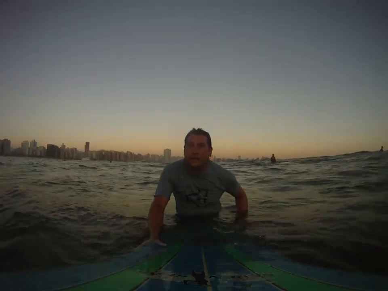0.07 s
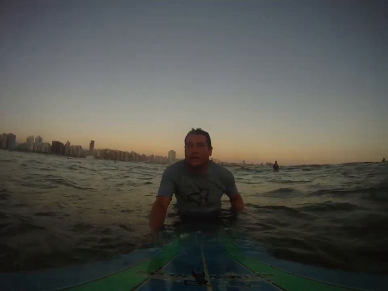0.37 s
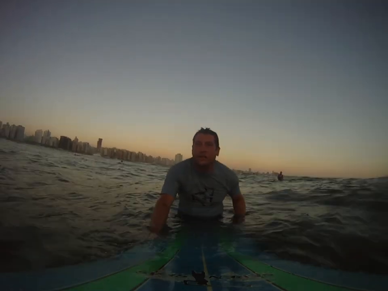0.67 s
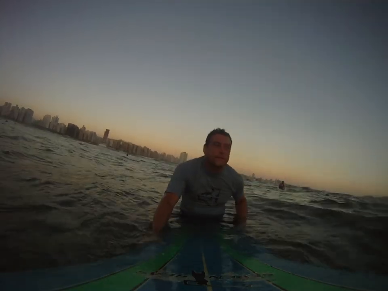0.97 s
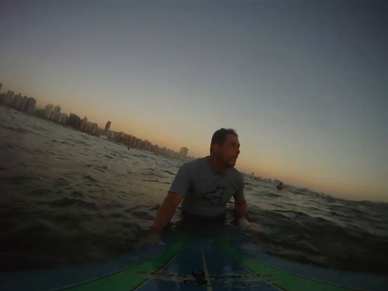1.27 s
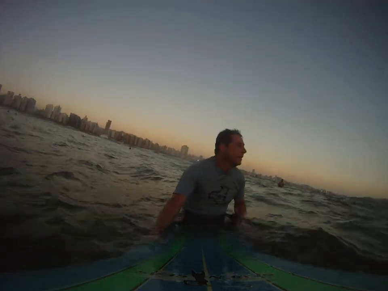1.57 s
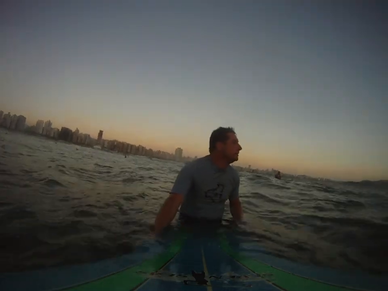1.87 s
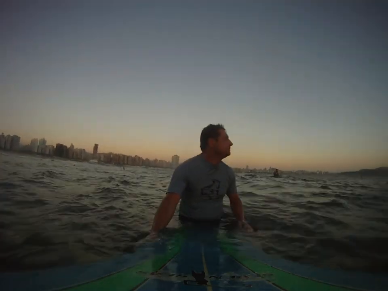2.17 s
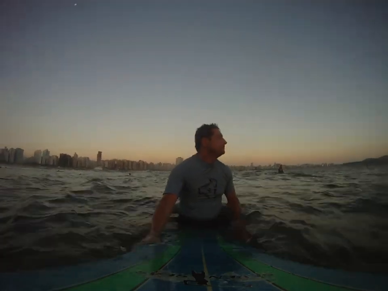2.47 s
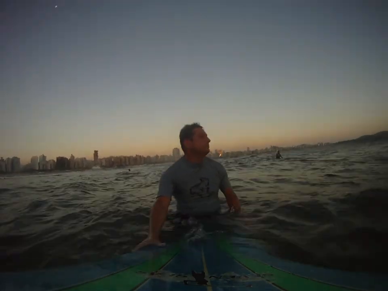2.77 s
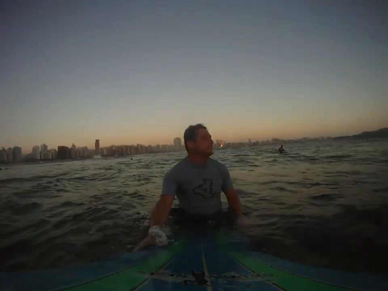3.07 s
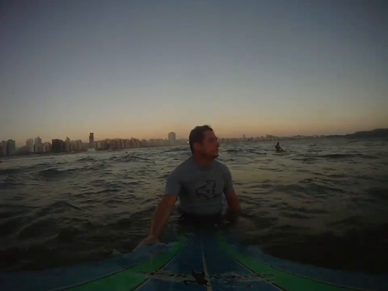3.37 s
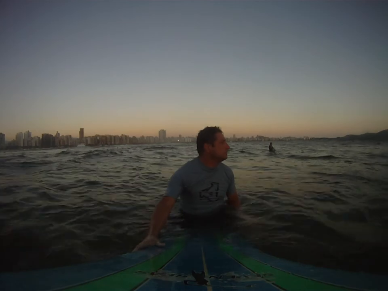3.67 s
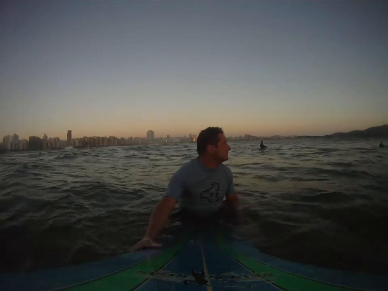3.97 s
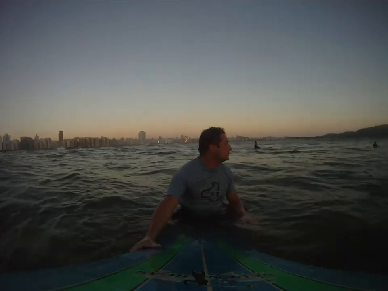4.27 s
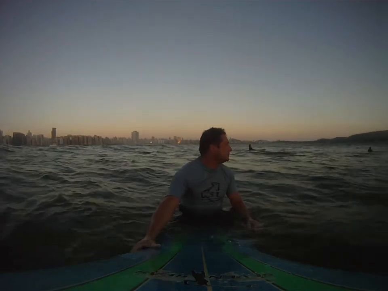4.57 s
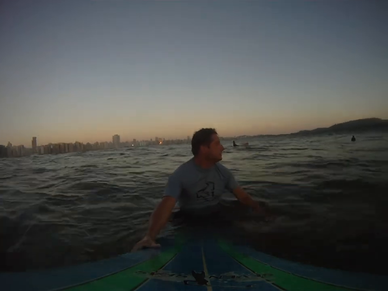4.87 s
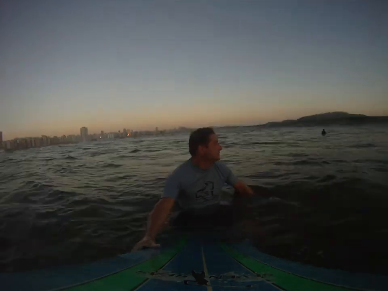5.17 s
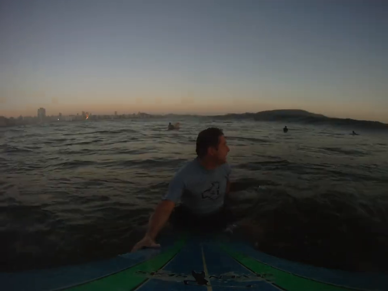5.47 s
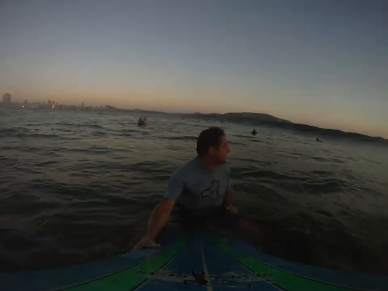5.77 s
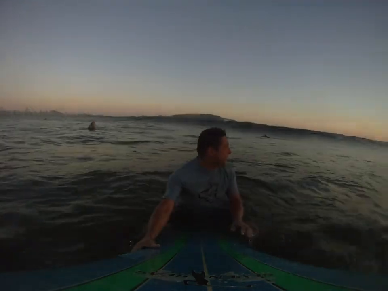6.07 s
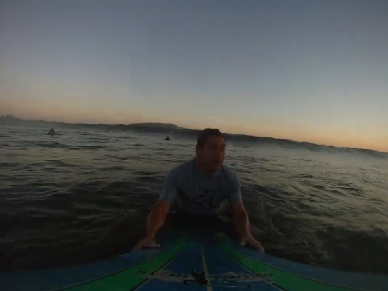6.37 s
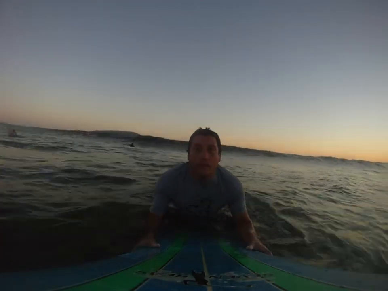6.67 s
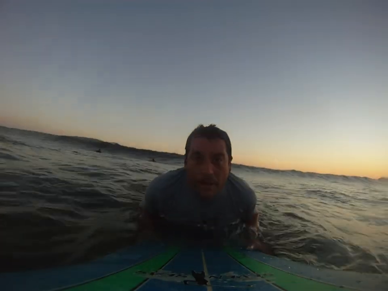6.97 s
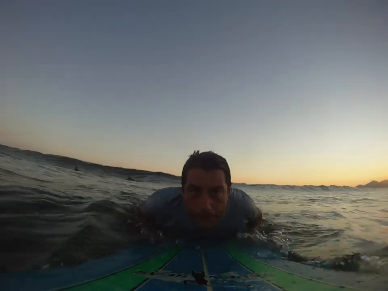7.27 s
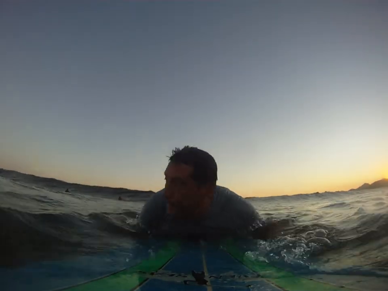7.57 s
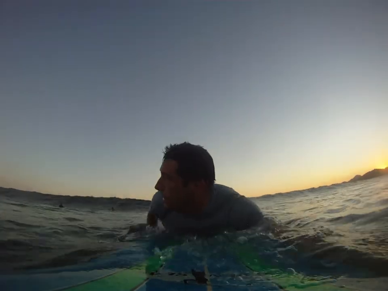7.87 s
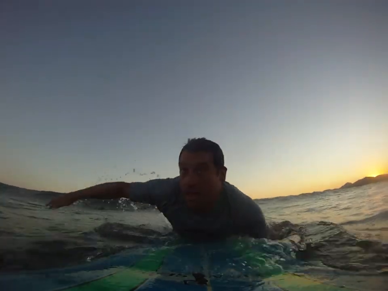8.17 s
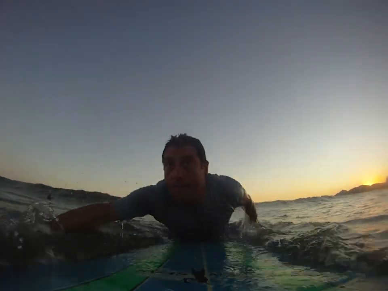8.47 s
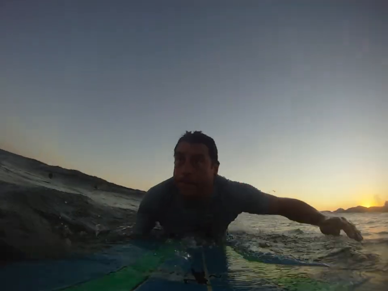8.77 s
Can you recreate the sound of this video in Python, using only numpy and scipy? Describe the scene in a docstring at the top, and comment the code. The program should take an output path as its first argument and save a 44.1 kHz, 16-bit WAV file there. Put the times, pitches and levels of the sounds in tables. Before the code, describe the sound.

Out on the sea, small waves wash unevenly along a surfboard, plipping and knocking softly over a faint steady wash. Past the middle, a deep boom and stronger rumble lead into paddling: repeated splashes, gulps of trapped air and ticking drops. Everything is heard very close, through a ringing waterproof case mounted on the board, with a thin fizz on top.

```python
"""First a wavelet washes along a rumbling surfboard: a surfer sits in choppy sea, then lies down to paddle.
Each wavelet or arm stroke swells and drains, stirring up ringing bubbles, foam, gulps of air and spray.
Slaps of water trap bubbles that go "plip", and bumps make the hull and the camera mount boom.
A camera rides on the nose, so the water is heard through its ringing waterproof case,
and the coarse steps of its 12 kHz recorder add a glassy fizz to everything."""
import sys
import numpy as np
from scipy import signal
from scipy.fft import rfft, irfft
from scipy.io import wavfile
from scipy.ndimage import uniform_filter1d, minimum_filter1d

SR = 44100
rng = np.random.default_rng(int(sys.argv[2]) if len(sys.argv) > 2 else 0)


def wrap_up_sound(samples):
    """Save the sound to the file named by the first command line argument, as 16-bit audio."""
    columns = np.atleast_2d(samples).T
    # keep every value between -1 and 1, then stretch to whole-number steps
    tamed = np.clip(columns, -1, 1)
    steps = np.round(tamed * 32767).astype(np.int16)
    wavfile.write(sys.argv[1], SR, steps)


N = 398663

# wavelets wash along the board's edges; fineness means treble over bass:
# (start [s], length [s], level [dB], fineness [dB], churned air [dB])
WAVELETS = [(0.0, 0.082, -31, 5.5, -41), (0.11, 0.097, -34, 1.5, -37.5), (0.38, 0.11, -41, 1, -69),
            (0.55, .2, -34, -10.5, -52), (0.82, 0.17, -35, -9, -66), (1.11, 0.159, -44, 0, -49.5),
            (1.42, 0.11, -48, 5, -51.5), (1.76, .15, -51, -23, -53), (2.15, .14, -41, -6, -68),
            (2.5, 0.16, -33, -10, -46), (2.69, 0.32, -32, -0.5, -39), (3.1, 0.037, -32.5, -13, -33.5),
            (3.22, 0.11, -39, -15, -45), (3.4, 0.1, -45, -8, -51), (3.73, .1, -34.5, -8.5, -42),
            (3.96, 0.052, -39, -6, -37.5), (4.24, .04, -43, 2, -49), (4.34, 0.101, -46, -4, -49.5),
            (4.66, 0.16, -43, 0.5, -76), (4.87, .15, -42, 0, -72), (5.2, 0.212, -44, -17, -54.5),
            (5.55, .16, -46, -9, -49), (5.98, .08, -42, -23, -41.5), (6.1, 0.078, -33, -11, -46),
            (6.28, 0.069, -29.5, -5, -42.5), (6.42, 0.36, -42, -4.5, -40.5), (6.82, 0.032, -32, -14, -44),
            (7.01, 0.15, -40, 1.5, -48)]
# the tones the camera case rings at: (pitch [Hz], width [Hz], level [dB])
CASE_TONES = [(274.6, 115, -17.5), (388, 36, -7.5), (461, 52, -12.5), (687, 43, -1), (755, 32, -4.5),
              (982, 75, -3.5), (1160, 303, 0.5), (1290, 130, -7.5), (1436, 37, -2.5), (1720, 220, -6),
              (1907, 86, -6.5), (2300, 103, 4), (2440, 632, 0), (2595, 250, -1.5), (3020, 150, -8.5),
              (3676, 380, -8.5)]
# choppy water and the rider shake the board: (time [s], level [dB])
BOARD_SHAKE = [(0.0, -25.5), (0.35, -42.5), (1.2, -42.5), (2.5, -44.5), (2.6, -28.5), (3.3, -33.5),
               (4.25, -34), (4.78, -42.5), (5.38, -42), (5.62, -32.5), (5.95, -37), (6.35, -24),
               (6.54, -30), (6.63, -18), (6.97, -24), (7.3, -18), (7.75, -21), (8.27, -26.5), (8.45, -21.5),
               (8.64, -22), (8.86, -15.5), (9.04, -21)]
# the low tones of board and mount: (pitch [Hz], width [Hz], level [dB])
MOUNT_TONES = [(27.6, 24, -16), (57, 37, -3.5), (87.84, 19.3, 6.5), (122, 22.4, -9.5), (236, 46, -29),
               (288.7, 9.6, -13), (375.8, 22, -32.5)]
# water and rider bump the hull: (time [s], level [dB], pitch [Hz], time to fade by 60 dB [s])
HULL_BUMPS = [(0.588, -28, 91.7, 0.33), (1.219, -23.5, 92.3, 0.19), (1.779, -24, 93.56, 0.2),
              (2.569, -12, 84.6, 0.19), (2.719, -18, 90.2, 0.15), (2.849, -16.5, 84.5, 0.26),
              (2.971, -19, 90, 0.11), (3.108, -25, 94, 0.11), (3.25, -23, 89.7, 0.21),
              (3.548, -19, 92.4, 0.28), (4.001, -23.5, 95.5, 0.12), (4.24, -26, 99, 0.22),
              (4.881, -25, 100, 0.31), (6.37, -17.5, 83, 0.13), (6.605, -2.5, 87.44, 0.14),
              (6.71, -10.5, 87, 0.16), (6.85, 9.5, 81.6, 0.036), (6.899, -2, 84, 0.15), (7.02, -10, 88, .2),
              (7.266, -2.5, 71.6, 0.16), (7.4, -4.5, 73.4, .08), (7.56, -5, 89.2, 0.1),
              (7.682, -6.5, 73, 0.16), (7.77, -9, 75.2, 0.13), (7.93, -7.5, 71.5, 0.096),
              (8.06, -11, 99, 0.12), (8.499, -5, 86.1, 0.093), (8.7, -13, 103.2, .12),
              (8.85, -10, 71.6, 0.22)]
# the tones of air pockets in churning water: (pitch [Hz], width [Hz], level [dB])
POCKET_TONES = [(243, 22, 0), (288.2, 18.6, 16), (340, 210, 1), (385, 27, 1), (385, 380, -7),
                (490, 25.3, -5)]
# big gulps of air under the board: (time [s], level [dB], pitch [Hz], time to fade by 60 dB [s])
AIR_GULPS = [(.11, -27, 290, 0.23), (2.729, -26, 385, 0.11), (3.781, -31, 385, 0.17),
             (3.98, -34, 275, 0.17), (7.339, -15, 310, 0.087), (7.385, -16, 212.6, 0.098),
             (7.43, -18, 352, 0.15), (7.574, -10, 289, 0.046), (7.66, -20, 274, 0.078),
             (7.85, -20, 291, .12), (7.914, -2.5, 385, 0.028), (8.009, -10.5, 278, 0.14),
             (8.35, -22, 323.3, .1), (8.517, -12.5, 297, 0.059), (8.604, -4.5, 255.4, 0.057),
             (8.85, -16, 285.3, 0.086), (8.962, -15, 300, 0.031), (9.0, -16.5, 233, 0.11)]
# the tones of fine spray on the case: (pitch [Hz], width [Hz], level [dB])
SPRAY_TONES = [(2670, 150, -50.5), (3520, 460, 13), (4200, 1400, 4.5), (5300, 1700, 3.5)]
# drops hit the case: (peak time [s], level over 10 ms [dB])
CASE_DROPS = [(.012, -44), (.125, -46), (0.325, -51.5), (.89, -50), (1.29, -56), (2.7, -59), (2.98, -51),
              (3.8, -53.5), (4.262, -54), (4.81, -50), (6.622, -50), (6.855, -41.5), (7.216, -30.5),
              (7.415, -49), (8.62, -32.5)]
# the loudest slaps at the board, each part bubble and part spatter:
# (peak time [s], level over 10 ms [dB], pitch [Hz], bubble share [0-1], rough length [s])
SLAPS = [(0.265, -36.5, 1155, 0.38, 0.0065), (0.325, -38.5, 2360, 0.85, 0.0071),
         (0.389, -23.5, 2380, .9, 0.0035), (0.445, -31, 1280, 0.92, 0.0064),
         (0.486, -32.5, 2340, 1, 0.0037), (0.563, -26.5, 2300, 0.5, 0.007), (0.657, -32, 1820, 0.93, 0.009),
         (0.77, -25, 1210, 0.88, 0.0078), (0.821, -35.5, 2630, .55, 0.0046), (0.855, -31, 1220, 1, 0.0045),
         (0.88, -24, 2234, 0.74, .01), (0.908, -28, 1160, .5, 0.0042), (0.926, -27, 1310, 0.55, 0.01),
         (0.957, -20.5, 1730, 0.73, 0.0046), (1.184, -33.5, 2460, .9, .004), (1.226, -30, 2340, .5, 0.0051),
         (1.291, -37, 2416, 0.67, 0.0054), (1.387, -34.5, 1250, 0.88, .011),
         (1.446, -38.5, 2450, .95, .007), (1.548, -36.5, 2550, 0.51, .011),
         (1.786, -30, 1080, 0.85, 0.0029), (1.932, -44.5, 2380, .95, .007), (2.159, -35, 1006, 0.47, .008),
         (2.19, -30.5, 2310, .3, 0.0083), (2.224, -26.5, 1144, 0.88, .006), (2.263, -30.5, 2416, 1, .004),
         (2.304, -26.5, 2210, 1, 0.0088), (2.472, -38.5, 2653, 0.63, 0.0068),
         (2.501, -28, 2350, 0.88, 0.0041), (2.581, -29, 980, 0.76, .006), (2.596, -27, 2510, 0.67, 0.0087),
         (2.69, -24.5, 1008, 0.21, 0.014), (2.756, -26.5, 1104, .95, 0.0045),
         (2.872, -30.5, 2250, 0.68, 0.0055), (2.973, -25, 1350, 0.7, 0.0063),
         (3.023, -33.5, 2380, 0.86, 0.0062), (3.11, -13.5, 1240, 0.84, 0.0031),
         (3.224, -31.5, 2360, 0.78, .008), (3.265, -39, 1459, .95, .005), (3.284, -24.5, 1099, 1, .006),
         (3.621, -29, 2163, 0.71, 0.0076), (3.689, -33, 1264, 1, 0.0093), (3.736, -49, 1200, 0.91, 0.0041),
         (3.798, -27.5, 2520, 0.46, 0.0033), (3.819, -30, 1190, .55, 0.00507),
         (3.913, -32.5, 1209, .7, 0.0048), (3.991, -38, 770, 0.46, 0.013),
         (4.001, -30.5, 1229, 0.55, 0.0037), (4.051, -32, 1120, 0.84, 0.0064),
         (4.23, -32.5, 1211, 0.72, 0.006), (4.269, -36.5, 2610, 0.36, 0.0052),
         (4.338, -31.5, 1160, 0.99, 0.0041), (4.389, -35.5, 1350, .2, 0.0086),
         (4.429, -40, 1190, 0.7, 0.0047), (4.664, -37.5, 2700, .95, .005), (4.709, -39, 2357, 0.92, 0.0052),
         (4.877, -29.5, 1195, 1, 0.0042), (4.97, -35.5, 1054, 0.089, .008),
         (5.161, -25, 1824, 0.42, 0.0077), (5.639, -32.5, 1206, 0.65, 0.0066),
         (5.959, -34, 1512, .85, 0.0067), (5.989, -29, 1227, 1, 0.0069), (6.043, -25, 731, 1, 0.013),
         (6.115, -24, 1213, 0.22, 0.005), (6.21, -26, 2440, 0.71, 0.0043),
         (6.287, -28.5, 2366, 0.99, 0.0058), (6.308, -23.5, 1290, 1, 0.006), (6.334, -33, 1190, 0.29, .011),
         (6.353, -30, 2581, .55, 0.0041), (6.366, -23.5, 1199, 1, .006), (6.598, -28, 1185, .2, 0.013),
         (6.655, -34.5, 1130, 0.66, .007), (6.836, -26.5, 1110, 0.82, 0.005),
         (6.847, -26.5, 1677, 0.045, .005), (7.063, -26, 2380, 0.57, 0.00685),
         (7.216, -21, 2283, 0.36, 0.012), (7.26, -19.5, 1030, .2, 0.0054), (7.328, -17, 860, .3, .012),
         (7.347, -19.5, 1400, 0.16, 0.0078), (7.431, -33, 1197, 0.81, .012), (7.648, -25.5, 1160, .4, .006),
         (7.886, -22.5, 1100, 0.6, 0.0051), (7.913, -19, 1085, .05, 0.0048), (8.008, -17, 1182, 0.71, .008),
         (8.033, -23, 2320, 0.32, 0.0059), (8.083, -20, 1296, 0.66, 0.0053),
         (8.26, -23, 2700, 0.32, 0.0034), (8.273, -22.5, 2440, 0.42, 0.0054),
         (8.31, -24.5, 2307, 0.31, 0.0036), (8.329, -19, 1222, 0.31, 0.012),
         (8.384, -16, 2550, 0.53, 0.0048), (8.417, -13.5, 2247, 0.67, 0.0096),
         (8.434, -21, 1126, 1, 0.0053), (8.448, -12.5, 1196, .7, 0.0054), (8.475, -20, 1150, 0.77, .006),
         (8.588, -24, 732, 0.85, .011), (8.631, -13.5, 2167, 0.17, 0.0072), (8.65, -15.5, 2316, .77, .009),
         (8.692, -19.5, 1086, 0.98, .006), (8.856, -13.5, 1185, 0.41, .01),
         (8.89, -20.5, 2444, 0.64, 0.0052), (8.942, -20.5, 1118, 0.59, .01),
         (8.965, -12, 1073, 0.98, 0.0026)]
# the rider drops into the water and pulls with his arms:
# (start [s], length [s], level [dB], fineness [dB], churned air [dB])
ARM_STROKES = [(7.199, 0.087, -28, 0, -50), (7.317, 0.081, -25, -6, -23), (7.48, 0.41, -31, -3, -32.5),
               (7.889, .16, -28.5, -0.5, -27.5), (8.151, .13, -39.5, 7, -33), (8.334, 0.06, -23, -2.5, -32),
               (8.429, 0.037, -17.5, 0.5, -23.5), (8.572, .11, -25.5, -4.5, -28),
               (8.758, 0.43, -29.5, -3, -31.5)]

WAVELET_RISE_S, WAVELET_DRAIN_S = .015, .028
STROKE_RISE_S, STROKE_DRAIN_S = .02, .05
CALM_DB, CALM_FINENESS_DB, CALM_AIR_DB = -57, -8.5, -54   # the water between wavelets
WAVELET_SPRAY_DB, STROKE_SPRAY_DB = -34, -28   # spray thrown, relative to the flow
SPRAY_PER_FINENESS = 0.24   # dB per dB: finer water throws more
TRICKLE_DB, TRICKLE_S = -5.5, 0.42   # spray falling back after a stroke: relative level, fading time


def from_db(db):
    """Turn decibels into a number to multiply a sound by."""
    return 10 ** (np.asarray(db) / 20)


def rms_one(x):
    """Scale a sound to an average level of 1."""
    return x / np.sqrt(np.mean(x ** 2) + 1e-20)


def sized(x):
    """Scale a short sound to the energy of 10 ms at level 1."""
    return x * np.sqrt(SR / 100 / np.sum(x * x))


def evened(x, seconds):
    """Keep the fast grain of a sound but hold its slow level at 1."""
    size = max(int(seconds * SR), 8)
    return x / np.sqrt(np.abs(uniform_filter1d(uniform_filter1d(x * x, size), size)) + 1e-12)


def in_time(rows):
    """Join (time, value) points with straight lines."""
    s, value = np.transpose(rows)
    return np.interp(np.arange(N) / SR, s, value)


def drift(rate_hz):
    """A smooth random wobble, about 1 in size."""
    r = np.exp(-2 * np.pi * rate_hz * 40 / SR)   # one step every 40 samples
    slow = signal.lfilter([1], [1, -2 * r, r * r], rng.standard_normal(N // 40 + 2002))[2000:]
    return np.interp(np.arange(N) / 40, np.arange(len(slow)), rms_one(slow))


def dull_noise(size, top_hz, order=2):
    """Hiss with its treble turned down."""
    return signal.sosfilt(signal.butter(order, top_hz, fs=SR, output="sos"), rng.standard_normal(size))


def ring(clicks, hz, fade_s):
    """Each click starts a tone that fades by 60 dB in fade_s."""
    r, w = from_db(-60 / (fade_s * SR)), 2 * np.pi * hz / SR
    return signal.lfilter([0, np.sin(w)], [1, -2 * r * np.cos(w), r * r], clicks + 1e-18)


def tap_sound(tones, size=16384):
    """How a body with these tones rings after one sharp tap."""
    hz = np.arange(size // 2 + 1) * SR / size
    power = sum(from_db(db) ** 2 / (1 + ((hz - centre) / (width * 0.58)) ** 2) ** 2
                for centre, width, db in tones)
    cepstrum = irfft(np.log(power + 1e-12) / 2)
    # put all the ringing after the tap, none before
    cepstrum[1:size // 2] *= 2
    cepstrum[size // 2 + 1:] = 0
    return irfft(np.exp(rfft(cepstrum)))[:size // 2]


def through(x, body):
    """Pass a sound through a ringing body."""
    return signal.fftconvolve(x, body)[:len(x)]


def add(out, s, sound):
    """Mix in a sound starting at s seconds."""
    start = max(round(s * SR), 0)
    out[start:start + len(sound)] += sound[:N - start]


def surges():
    """Wavelets and strokes add up to the water's flow, fineness, churned air and spray, each in dB."""
    t = np.arange(0, N, 40) / SR

    def swell(start, length, rise_s, drain_s):
        return np.exp(np.minimum(t - start, 0) / rise_s - np.maximum(t - start - length, 0) / drain_s)

    flow, air = from_db(CALM_DB) ** 2, from_db(CALM_AIR_DB) ** 2
    fine, mist = flow * CALM_FINENESS_DB, 1e-14
    for rows, rise_s, drain_s, spray_db in ((WAVELETS, WAVELET_RISE_S, WAVELET_DRAIN_S, WAVELET_SPRAY_DB),
                                            (ARM_STROKES, STROKE_RISE_S, STROKE_DRAIN_S, STROKE_SPRAY_DB)):
        for start, length, db, fine_db, air_db in rows:
            shape = swell(start, length, rise_s, drain_s)
            power = (from_db(db) * shape) ** 2
            flow += power
            fine += power * fine_db
            air += (from_db(air_db) * shape) ** 2
            mist += power * from_db(spray_db + SPRAY_PER_FINENESS * fine_db) ** 2
    for start, length, db, _, _ in ARM_STROKES:
        trickle = swell(start, length, STROKE_RISE_S, TRICKLE_S)
        mist += (from_db(db + STROKE_SPRAY_DB + TRICKLE_DB) * trickle) ** 2
    levels = 10 * np.log10(flow), fine / flow, 10 * np.log10(air), 10 * np.log10(mist)
    return [in_time(np.column_stack([t, db])) for db in levels]


def bubble(t, hz, swell_s, rise):
    """A bubble swells and rings out; a positive rise lifts its pitch as it nears the surface."""
    age = t / swell_s
    pitch_hz = hz * (1 + rise * np.tanh((age - 1) / 3))
    return age ** 2 * np.exp(-2 * age) * np.sin(2 * np.pi * np.cumsum(pitch_hz) / SR)


def wash(case, flow_db, fineness_db, low_hz=850, high_hz=3500, split_hz=1700,
         clump_db=3.0, size_db=5.5, foam_db=-4.5):
    """Small bubbles ring in clumps over soft foam; stronger flow makes more of them."""
    stir = from_db(flow_db + 40)
    clumps = from_db(clump_db * drift(30))
    bubbles_per_s = 450 * stir ** .6 * clumps
    born = np.flatnonzero(rng.random(N) < bubbles_per_s / SR)
    bubbles, t = np.zeros(N), np.arange(SR // 40) / SR
    for at, (pitch, size, life) in zip(born, rng.random((len(born), 3))):
        hz = low_hz * (high_hz / low_hz) ** pitch
        height = from_db(size_db * min(-np.log(1 - size), 3.5))   # many quiet, a few loud
        add(bubbles, at / SR, height * bubble(t, hz, swell_s=3.1 * (.5 + life) / hz, rise=.04 * life))
    foam = evened(through(dull_noise(N, top_hz=3000) * clumps, case), 0.41)
    # hard stirring beats the single bubbles into dense foam
    foam *= from_db(foam_db) * np.maximum(stir, 1) ** 0.37
    water = np.sqrt(np.minimum(stir, 1)) * evened(through(bubbles, case), 0.12) + foam
    # finer water shifts the weight from the large bubbles to the small ones
    bass = signal.sosfiltfilt(signal.butter(3, split_hz, fs=SR, output="sos"), water)
    water = evened(bass + from_db(fineness_db) * (water - bass), .04)
    ripple_db = drift(22)
    return from_db(flow_db + ripple_db) * water


def board(gain_db=-.5, lumpy_db=3.5, softness=0.038):
    """Choppy water and wind make the board rumble; wavelets and the rider's body thump it."""
    shaking = through(rng.standard_normal(N) * from_db(lumpy_db * drift(8.2)), tap_sound(MOUNT_TONES))
    out = from_db(in_time(BOARD_SHAKE) + gain_db) * evened(shaking, 0.055)
    t = np.arange(SR // 3) / SR
    for s, db, hz, fade_s in HULL_BUMPS:
        # a hard knock is short; a soft shove builds up and lingers
        build_up = 1 - np.exp(-t / (softness * fade_s))
        add(out, s, from_db(db) * ring(t == 0, hz, fade_s) * build_up)
    return out


def open_sea(case, level_db=-54):
    """Waves farther off blend into a smooth, steady wash."""
    return from_db(level_db) * rms_one(through(dull_noise(N, top_hz=1500, order=1), case))


def churn(air_db, gain_db=-2.5, lumpy_db=3.5, gulp_rise_s=0.0019):
    """Large air pockets gurgle and gulp under the board."""
    rolling = rng.standard_normal(N) * from_db(lumpy_db * drift(30))
    out = from_db(air_db + gain_db) * evened(through(rolling, tap_sound(POCKET_TONES)), 0.062)
    t = np.arange(SR // 4) / SR
    for s, db, hz, fade_s in AIR_GULPS:
        add(out, s, from_db(db) * ring(t == 0, hz, fade_s) * (1 - np.exp(-t / gulp_rise_s)))
    return out


def spray(spray_db, gain_db=1.5, drop_s=0.0034, floor_db=-71):
    """Foam hisses on the case with a slight patter; now and then a drop ticks on it."""
    fizz, t = tap_sound(SPRAY_TONES), np.arange(-SR // 50, SR // 50) / SR
    hiss = rng.standard_normal(N) * from_db(2.5 * drift(70))
    out = (from_db(spray_db + gain_db) + from_db(floor_db)) * evened(through(hiss, fizz), 0.34)
    for s, db in CASE_DROPS + stray_drops(spray_db):
        tick = through(rng.standard_normal(len(t)) * np.exp(-(t / drop_s) ** 2), fizz)
        add(out, s + t[0], from_db(db) * sized(tick))
    return out


def stray_drops(spray_db, per_s=14, over_spray_db=10.0, spread_db=5):
    """Extra drops land by chance, louder in heavier spray; rows as in CASE_DROPS."""
    draws = rng.random((240, 3))
    return [(when * N / SR, spray_db[int(when * N)] + over_spray_db + spread_db * (2 * size - 1))
            for chance, when, size in draws if chance < per_s * N / SR / len(draws)]


def slaps(case, flow_db, runoff_db=-22, runoff_s=0.025, thud_db=-15):
    """A wavelet slaps the board with a short spatter, traps a ringing bubble and nudges the mount."""
    out, t = np.zeros(N), np.arange(SR // 6) / SR
    thud = from_db(thud_db) * sized(tap_sound(MOUNT_TONES)[:len(t)])
    for s, db, hz, share, length in SLAPS + stray_slaps(flow_db):
        share = np.clip(share, .02, .93)   # always some bubble and some spatter
        swell_s = .55 * length
        plip = through(bubble(t, hz, swell_s, rise=0.045 * rng.normal()), case)
        hit = np.exp(-((t - swell_s) / (0.97 * length)) ** 2)
        runoff = from_db(runoff_db) * np.exp(-t / runoff_s) * np.minimum(t / swell_s, 1)
        spatter = (hit + runoff) * evened(dull_noise(len(t), top_hz=3000), 0.00091)
        # the size of the air pocket colours the spatter
        pocket = ring(spatter, hz, fade_s=0.64 / hz)
        spatter = through(sized(spatter) + 0.54 * sized(pocket), case)
        sound = sized(np.sqrt(share) * sized(plip) + np.sqrt(1 - share) * sized(spatter))
        add(out, s - swell_s - .001, from_db(db) * (sound + thud))
    return out


def stray_slaps(flow_db, per_s=7, over_flow_db=3.0, spread_db=3,
                low_hz=1150, high_hz=3000, length_s=0.004975):
    """Extra slaps come by chance, a little louder than the wash; rows as in SLAPS."""
    draws = rng.random((240, 5))
    return [(when * N / SR, flow_db[int(when * N)] + over_flow_db + spread_db * (2 * size - 1),
             low_hz * (high_hz / low_hz) ** pitch, np.sqrt(share), length_s)
            for chance, when, size, pitch, share in draws if chance < per_s * N / SR / len(draws)]


def limiter(x, release_db_per_s=40, size=88):
    """The volume ducks quickly under a peak above 1 and creeps back."""
    climb = release_db_per_s * np.arange(N) / SR
    over_db = 20 * np.log10(np.maximum(np.abs(x).max(axis=0), 1))
    over_db = np.maximum.accumulate(over_db + climb) - climb
    return x * from_db(uniform_filter1d(minimum_filter1d(-over_db, size), size))


def scene(hiss_db=-77):
    """Left and right get the same water and board, each with its own faint, even hiss."""
    case = tap_sound(CASE_TONES)
    flow_db, fineness_db, air_db, spray_db = surges()
    water = slaps(case, flow_db) + wash(case, flow_db, fineness_db) + spray(spray_db) + churn(air_db)
    return water + board() + open_sea(case) + from_db(hiss_db) * rng.standard_normal((2, N))


def record(dry, coarse_hz=12000, top_hz=15200):
    """The recorder tames peaks, then holds each coarse sample; the steps add fizz, and the top is cut."""
    coarse = signal.resample_poly(limiter(dry), coarse_hz, SR, axis=1)
    coarse = signal.sosfilt(signal.butter(1, 5700, fs=coarse_hz, output="sos"), coarse)
    steps = np.repeat(np.clip(coarse, -.9, .9), 4, axis=1)
    fizzy = signal.resample_poly(steps, SR, 4 * coarse_hz, axis=1)[:, :N]
    return signal.sosfilt(signal.butter(28, top_hz, fs=SR, output="sos"), fizzy)


dry = scene()
out = record(dry)
wrap_up_sound(out)
```